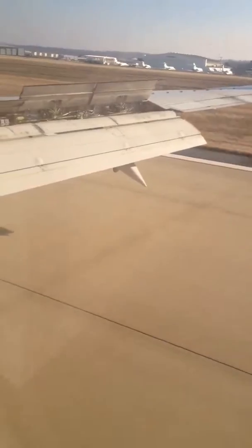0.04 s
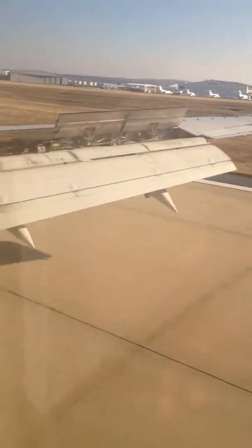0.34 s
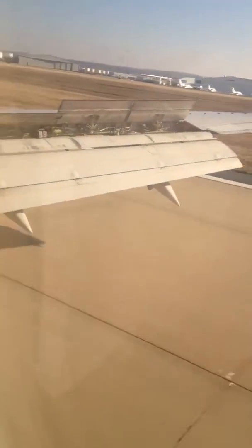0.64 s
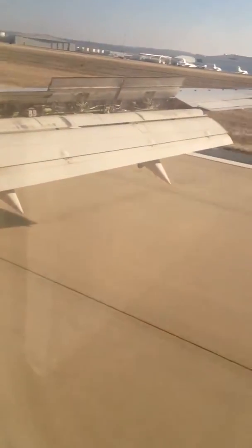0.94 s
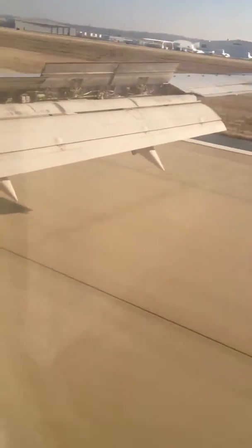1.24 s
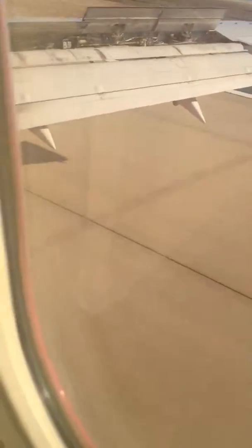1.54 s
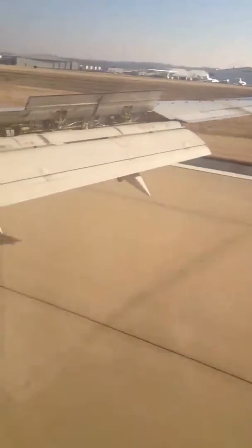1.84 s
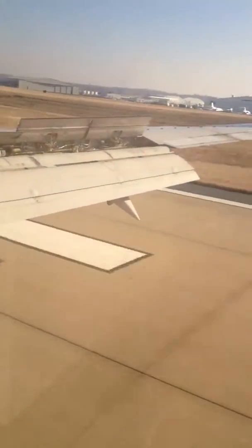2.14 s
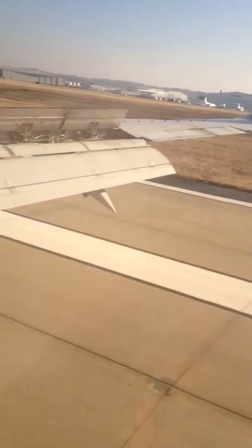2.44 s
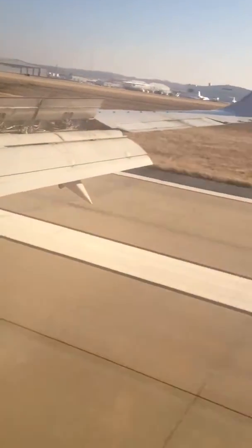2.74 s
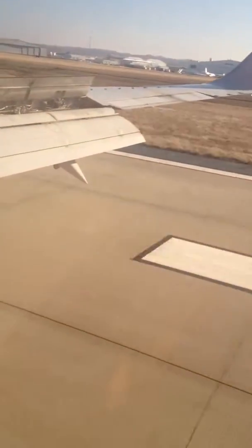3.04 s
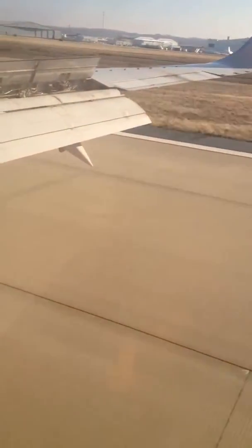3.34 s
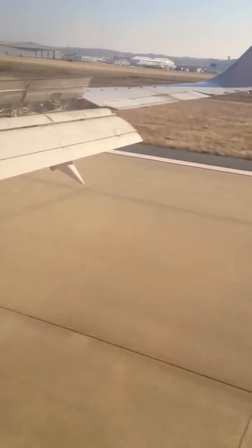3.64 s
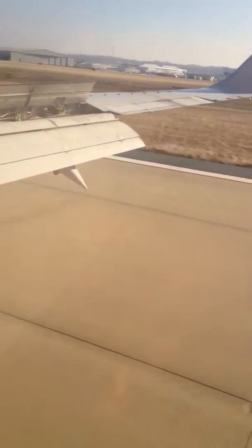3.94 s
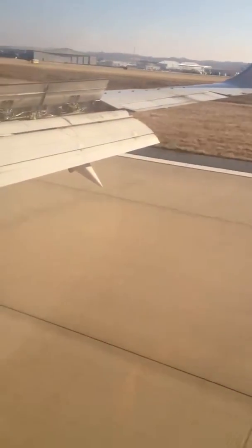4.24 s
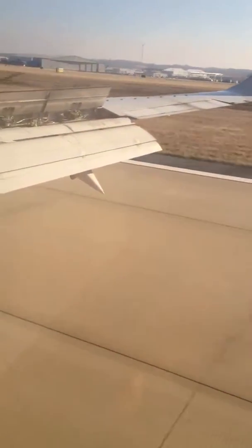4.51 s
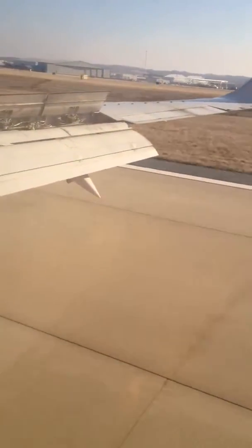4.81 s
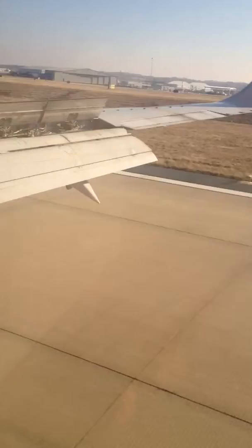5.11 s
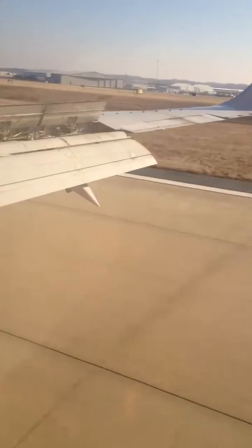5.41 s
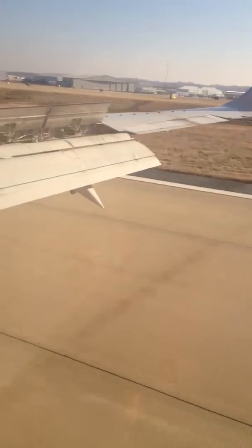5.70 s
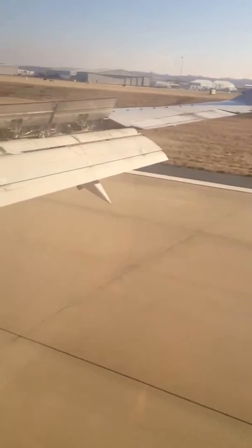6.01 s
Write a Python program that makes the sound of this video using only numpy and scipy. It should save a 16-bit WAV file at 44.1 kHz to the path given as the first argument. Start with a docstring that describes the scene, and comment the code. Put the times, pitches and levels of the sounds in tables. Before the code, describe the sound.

Inside an airliner, by a window over the wing, a loud deep rumble fills the cabin as the plane rolls out after landing. A few dull runway bumps jolt the hull at first, over an engine hum, rushing air and a thin vent hiss. About halfway the rumble eases, the hum sinks slightly and the wheels throb, turning slower. Cabin trim ticks faintly and rustles briefly near the end.

```python
"""Inside an airliner, by a window over the wing, as the plane rolls out after landing. At first the runway
jolts the hull and shakes it into a deep rumble, while an engine hums, air rushes past the spoilers (the wing's
brake flaps) and the vents hiss. About halfway the rumble eases, the hum sinks in pitch and the wheels throb
more strongly, turning ever slower. The cabin trim ticks now and then throughout, and near the end a short
rustle of clicks sounds close by."""
import sys
import numpy as np
from scipy import signal
from scipy.fft import rfft, irfft
from scipy.io import wavfile
from scipy.ndimage import uniform_filter1d, minimum_filter1d

SR = 44100
rng = np.random.default_rng(int(sys.argv[2]) if len(sys.argv) > 2 else 0)


def file_out(sig):
    """Save sig as 16-bit WAV at sys.argv[1]."""
    # one column per channel
    cols = np.atleast_2d(sig).T
    # limit, then scale
    lim = np.clip(cols, -1, 1)
    pcm = np.round(lim * 32767).astype(np.int16)
    wavfile.write(sys.argv[1], SR, pcm)


N = 267246
T = np.arange(N) / SR  # the time of each sample, in seconds
HZ = np.fft.rfftfreq(N, 1 / SR)  # the frequencies of the spectrum


def gain_of(db):
    """Turns decibels into a factor to multiply by."""
    return 10 ** (np.asarray(db) / 20)


def unit_level(x):
    """Scales a signal to an average (rms) size of 1."""
    return x / np.sqrt(np.mean(x ** 2) + 1e-20)


def follow(rows, column=1):
    """Joins the rows of a timed table with straight lines, giving a value for every sample."""
    rows = np.asarray(rows)
    return np.interp(T, rows[:, 0], rows[:, column])


def spectrum(points):
    """Joins (Hz, dB) points into a level for every frequency."""
    hz, db = np.transpose(points)
    return np.interp(np.log(HZ + 1), np.log(hz), db)


def noise(db):
    """Noise of average size 1, coloured by a spectrum in dB."""
    return unit_level(irfft(rfft(rng.standard_normal(N)) * gain_of(db), N))


def wander(hz):
    """A random drift of average size 1, with wiggles up to about hz."""
    return noise(-10 * np.log10(1 + (HZ / hz) ** 4))


def add(mix, start, sound):
    """Mixes a sound in at a start time in seconds."""
    part = mix[max(round(start * SR), 0):][:len(sound)]
    part += sound[:len(part)]


def cabin_colour(ripple_hz=60, strongest_hz=1400):
    """The cabin's tone in dB: walls and air ring, and reflections ripple the middle frequencies."""
    # Ringing panels and air, and the gaps between. Each row: centre in Hz, width in Hz, lift in dB.
    resonances = [(330, 5.8, 4), (394, 9.1, -0.5), (424.6, 26.4, 4.5), (650, 42, 2.5), (733, 24, -2.5),
                  (791, 28, 4.5), (860, 32, 5.5), (1067, 14, 4)]
    ringing_db = sum(db / (1 + (2 * (HZ - hz) / width) ** 2) for hz, width, db in resonances)
    ripple_db = unit_level(uniform_filter1d(rng.standard_normal(len(HZ)), int(ripple_hz / HZ[1])))
    return ringing_db + ripple_db * np.exp(-.5 * np.log((HZ + 1) / strongest_hz) ** 2)


def vent():
    """Air from a vent makes a fuzzy whistle with a thin sizzle."""
    # The vent's loudness. Each row: time in seconds, level in dB.
    levels = [(0, -56), (.5, -56.5), (1.5, -56.5), (2.2, -53.5), (3.2, -60), (4.4, -52), (6.06, -52.5)]
    # The vent's tone. Each row: frequency in Hz, relative level in dB.
    colour = [(4000, -37), (4820, -14), (4990, 1), (5160, -10), (6000, -15), (10000, -22), (12000, -16),
              (13600, -18), (15500, -28)]
    return gain_of(follow(levels)) * noise(spectrum(colour))


def rushing_air(cabin_db, flutter_db=0.73):
    """Swirling air roars over the spoilers, and a fluttering hiss fills the cabin."""
    # Moving air. Each row: time in seconds, relative level in dB of the roar outside, of the hiss inside.
    levels = [(0, -33.5, -43.5), (.6, -36.5, -45.5), (1.1, -34, -43.5), (1.45, -36.5, -45),
              (2.15, -33, -42.5), (2.7, -35, -44.8), (3.7, -36.5, -46), (6.06, -39, -46)]
    # The tones of the roar and the hiss. Each row: frequency in Hz, relative level in dB.
    roar_colour = [(300, -13.5), (480, 0.5), (560, -1.5), (630, -1), (800, -5), (900, -6), (1050, -10),
                   (1250, -15), (1600, -20), (2500, -46), (5000, -64)]
    hiss_colour = [(700, -1), (1500, 3), (2100, 4), (2700, 2.5), (3300, -0.5), (4400, 0), (5100, 1.5),
                   (5900, -4), (7500, -4.5), (8600, -8.5), (9800, -19.5), (10800, -36), (12200, -20),
                   (15500, -16)]
    roar_db = follow(levels) + 1.5 + wander(17)
    roar = gain_of(roar_db) * noise(spectrum(roar_colour) + cabin_db)
    hiss_db = follow(levels, column=2) + 1.34 + flutter_db * wander(23)
    hiss = gain_of(hiss_db) * noise(spectrum(hiss_colour) + cabin_db)
    return roar + hiss


def scrape(db, hz, decay, octaves, rise_share=0.55, grain_db=1.5):
    """Two surfaces rub in a burst of tiny slips, loudest 0.2 seconds in."""
    t = np.arange(-SR // 5, SR // 5) / SR
    hiss, grain = rng.standard_normal((2, len(t)))
    slips = hiss * gain_of(grain_db * unit_level(uniform_filter1d(grain, size=40)))
    off_centre = np.log2((np.fft.rfftfreq(len(t), 1 / SR) + 1) / hz) / octaves
    band = np.exp(-(off_centre / 3) ** 2) / (1 + off_centre ** 2)
    slips = unit_level(irfft(rfft(slips) * band, len(t)))
    envelope = np.exp(-np.where(t < 0, (t / (rise_share * decay)) ** 2, t / decay))
    return gain_of(db) * slips * envelope


def ticks_and_rustle(faint_count=24, faint_db=-56, dip_hz=10300, dip_db=-5):
    """Shaken trim ticks, fainter ticks at random times, and a short rustle of clicks near the end."""
    # Rattles. Each row: peak time in seconds, relative level in dB, centre in Hz,
    # fade time in seconds, width in octaves.
    rattles = [(.725, -47, 8000, .012, .7), (1.655, -51, 11000, 0.066, 0.79),
               (2.142, -39, 5500, 0.017, 1.2), (2.26, -49, 8000, .012, .6),
               (2.368, -43, 1700, 0.0099, 0.48), (2.518, -44, 7500, .005, .5), (4.093, -48, 6500, .007, .7),
               (4.397, -44, 7970, .009, .4), (5.117, -40, 7460, .005, .35), (5.719, -38, 7200, .003, .4),
               (5.791, -35.5, 4170, 0.014, .65), (5.851, -36, 5500, 0.0049, 1.2),
               (5.861, -31.5, 6560, 0.0097, 0.9), (5.871, -32.5, 3300, 0.01, 0.61),
               (5.904, -36.5, 3760, .012, 0.7), (6.012, -44, 5900, .008, 0.51)]
    faint = [(when * T[-1], faint_db + 5 * loud, 4000 + 4000 * high, .005, .7)
             for when, loud, high in rng.random((faint_count, 3))]
    ticks = np.zeros(N + SR)
    for time, db, hz, decay, octaves in rattles + faint:
        add(ticks, time, scrape(db, hz, decay, octaves))
    ticks = ticks[SR // 5:][:N]  # moves each peak to its listed time
    dip = gain_of(dip_db * np.exp(-((HZ - dip_hz) / 1500) ** 2))  # dulls part of the treble
    return irfft(rfft(ticks) * dip, N)


def engine(waver_hz=0.77, waver_db=2):
    """An engine winds down with a wavering hum."""
    # The hum. Each row: time in seconds, pitch in Hz, level in dB.
    hum = [(0, 197.8, -24), (2.5, 199.4, -44), (4.2, 188.8, -34), (5.3, 186.3, -30), (6.06, 182.9, -27.5)]
    cycles = np.cumsum(follow(hum) + waver_hz * wander(2.23)) / SR
    level_db = follow(hum, column=2) + waver_db * wander(10)
    return gain_of(level_db) * unit_level(np.sin(2 * np.pi * cycles))


def wheels(floor_hz=101, width_hz=7, shimmy_turns=0.019):
    """One thump a turn: each wheel overtone swells as it slides past the pitch where the floor rings."""
    # The main wheels' speed. Each row: time in seconds, turns per second.
    speeds = [(0, 9.3), (1.8, 8.7), (3.4, 8.38), (4.6, 7.8), (5.3, 7.37), (6.06, 7.1)]
    # The tyres' throb. Each row: time in seconds, level in dB.
    levels = [(0, -35), (1.85, -34), (3.25, -39.5), (3.5, -30.5), (4.2, -30.5), (4.85, -39), (5.8, -32),
              (6.06, -38.5)]
    rate = follow(speeds)
    turns = np.cumsum(rate) / SR
    turns -= np.interp(3.52, T, turns)  # a thump falls near 3.52 seconds
    turns += shimmy_turns * wander(2.25)
    throb = sum(np.exp(-.5 * ((k * rate - floor_hz) / width_hz) ** 2) * np.cos(2 * np.pi * k * turns)
                for k in range(8, 18))
    return gain_of(follow(levels) + wander(7.7)) * unit_level(throb)


def jolts(hull_hz=225, rise_s=0.0071):
    """Each bump makes the hull ring for a few cycles."""
    # Runway bumps. Each row: start in seconds, peak level in dB.
    bumps = [(0.306, -11), (0.766, -3), (1.178, -7), (2.241, -16), (3.299, -18), (3.42, -9.5), (3.862, -15),
             (5.647, -17)]
    out, t = np.zeros(N), np.arange(SR // 10) / SR
    envelope = t / rise_s * np.exp(1 - t / rise_s)
    for start, db in bumps:
        hz = hull_hz * rng.uniform(0.705, 1.181)
        add(out, start, gain_of(db) * envelope * np.sin(2 * np.pi * hz * t))
    return out


def surges(swell_s=0.025, delay_s=0.061, duck_s=0.037):
    """In dB: the rumble swells briefly, then the level ducks for a moment, as with a gain control."""
    # Surges. Each row: time in seconds, swell in dB, depth of the duck after it in dB.
    swings = [(.05, 3, 1), (.99, 4, 2.5), (1.18, 6, 6.5), (1.36, 3.5, 2.5), (1.69, 2, 2), (3.32, 3, 3.5),
              (4.59, 3.5, 0.5), (5.72, 0.5, 4), (6.0, 3.5, 0)]
    return sum(swell_db * np.exp(-((T - time) / swell_s) ** 2)
               - duck_db * np.exp(-((T - time - delay_s) / duck_s) ** 2)
               for time, swell_db, duck_db in swings)


def rumble(cabin_db, slowing_s=(2.62, 4.04), steady_s=0.092, uneven_db=0.17):
    """The rough runway booms through the hull, and the boom eases as the plane slows."""
    # The hull's shaking. Each row: time in seconds, level in dB.
    shaking = [(0, -13.5), (1.4, -15), (1.85, -13.5), (2.3, -13.5), (2.55, -16), (3.3, -15.5), (3.7, -18.5),
               (6.06, -22.5)]
    # The hull's tone, rolling fast and slow. Each row: frequency in Hz, relative level in dB.
    fast_colour = [(25, -50), (45, -43), (62, -23), (78, -22), (100, -13), (135, -11), (175, -1.5),
                   (212, 1), (270, -4), (345, -8.5), (378, -12), (450, -15.5), (530, -29), (900, -67)]
    slow_colour = [(25, -51), (45, -36), (62, -27), (78, -20), (100, -14), (135, -9), (175, -3), (200, 1),
                   (260, -4), (340, -8), (368, -11), (450, -14.5), (530, -27), (900, -63.5)]
    fast = noise(spectrum(fast_colour) + cabin_db)
    slow = noise(spectrum(slow_colour) + cabin_db)
    slowed = np.interp(T, slowing_s, (0, 1))
    boom = np.sqrt(1 - slowed) * fast + np.sqrt(slowed) * slow
    window = int(steady_s * SR)
    power = uniform_filter1d(uniform_filter1d(boom ** 2, window), window)
    boom /= np.sqrt(power + 1e-9)  # evens out the noise's own slow swells
    return gain_of(follow(shaking) + surges() - uneven_db * wander(16)) * boom


def scene():
    """Everything heard from the window seat, in one channel."""
    cabin_db = cabin_colour()
    rolling = rumble(cabin_db) + wheels() + engine() + jolts()
    return (rolling + rushing_air(cabin_db) + vent() + ticks_and_rustle())[None]


def record(dry, ceiling=0.65, top_hz=15350):
    """Turns the loudest peaks down for a moment, then cuts off the highest treble."""
    allowed_gain = np.minimum(1, ceiling / (abs(dry) + 1e-9))
    limited = dry * uniform_filter1d(minimum_filter1d(allowed_gain, size=300), size=300)
    treble_cut = signal.firwin(511, top_hz, window=("kaiser", 9), fs=SR)
    return signal.oaconvolve(limited, treble_cut[None], "same")


dry = scene()
out = record(dry)
file_out(out)
```